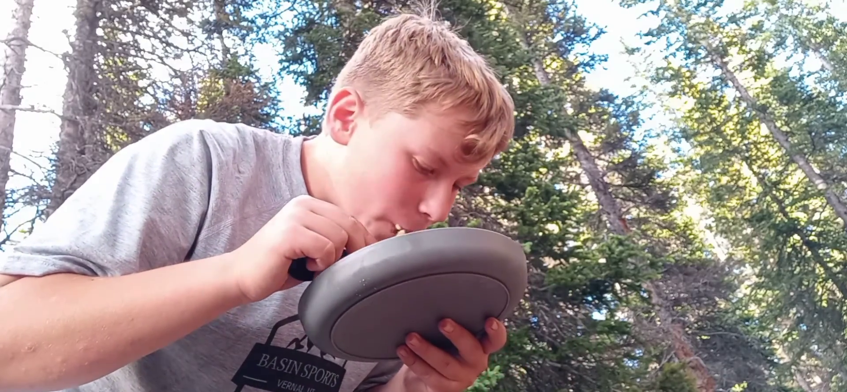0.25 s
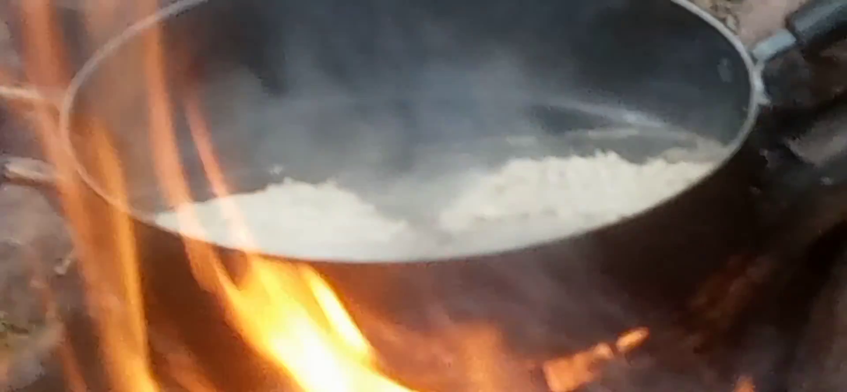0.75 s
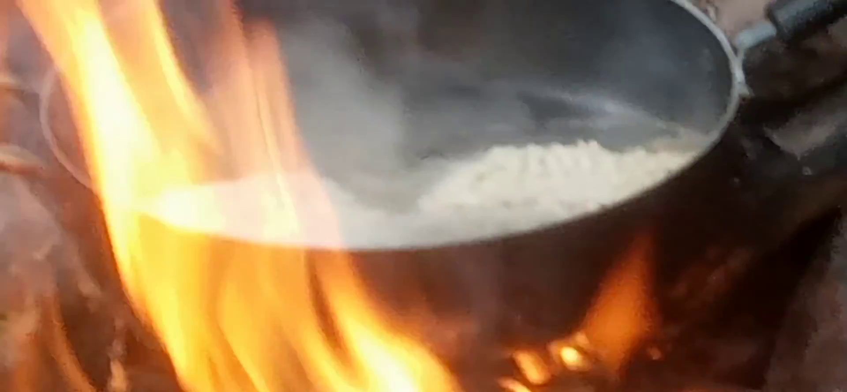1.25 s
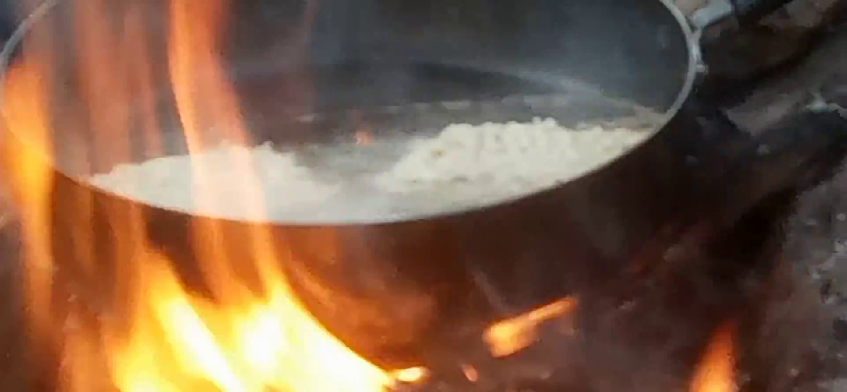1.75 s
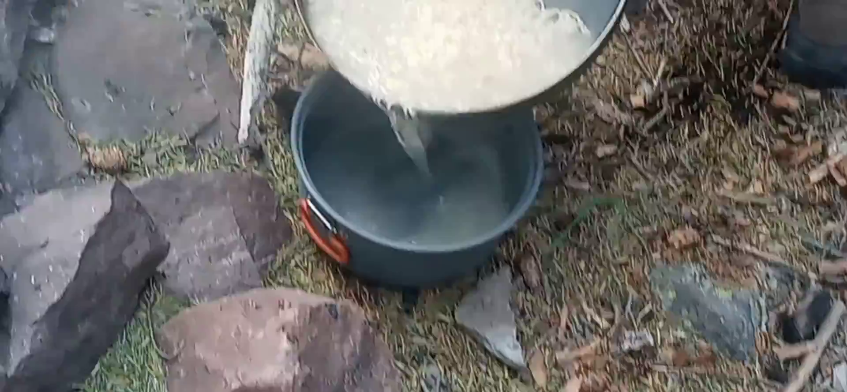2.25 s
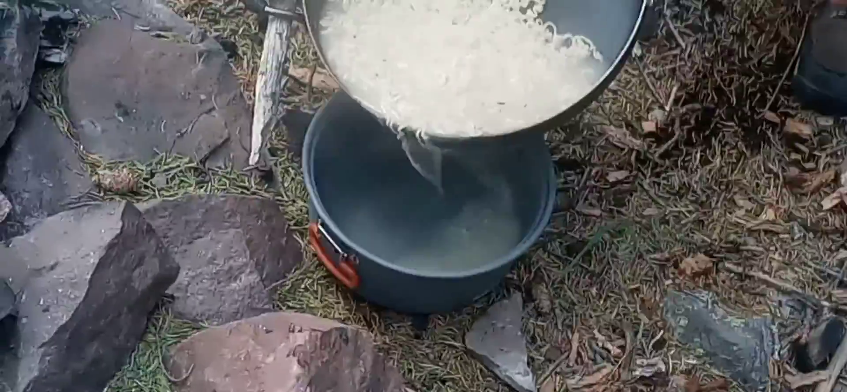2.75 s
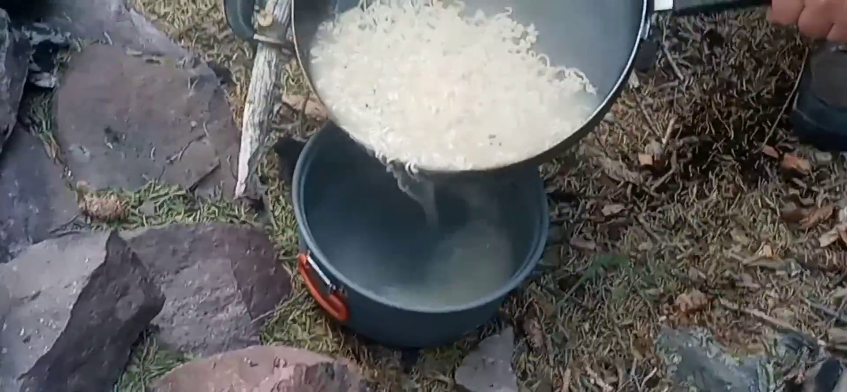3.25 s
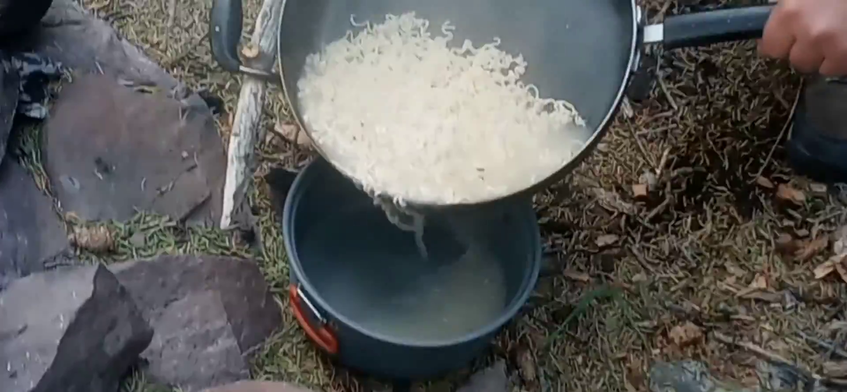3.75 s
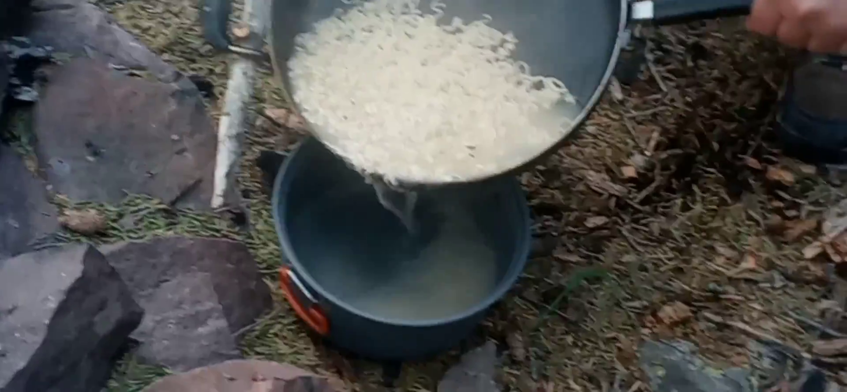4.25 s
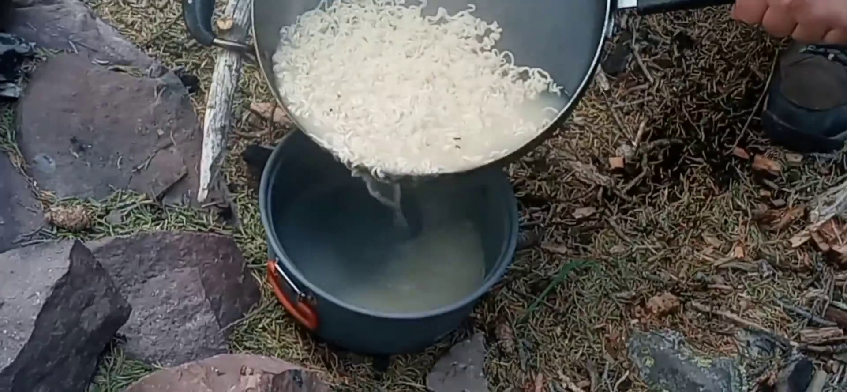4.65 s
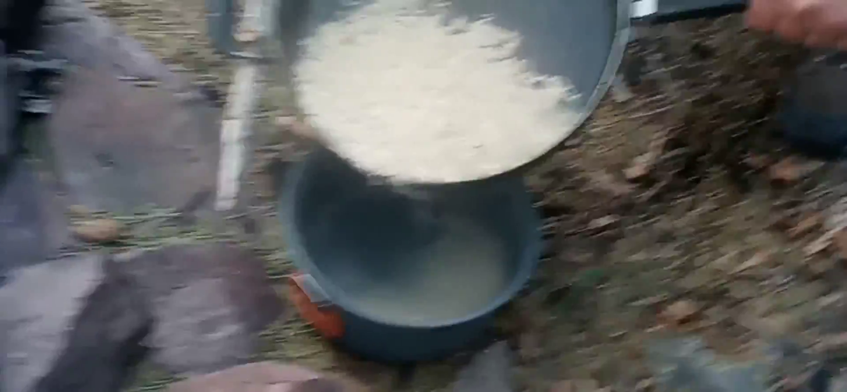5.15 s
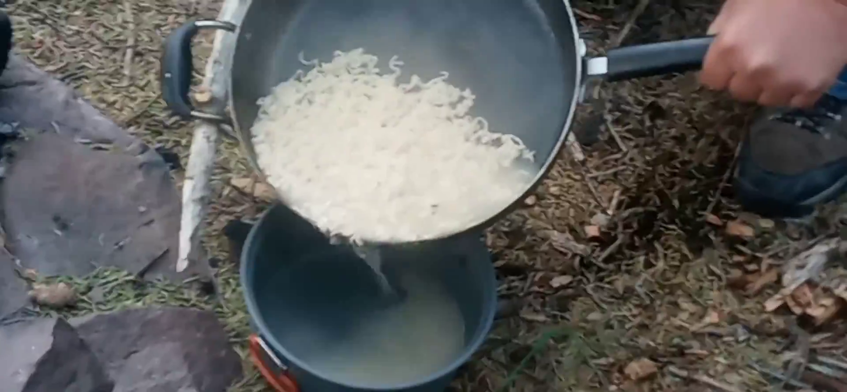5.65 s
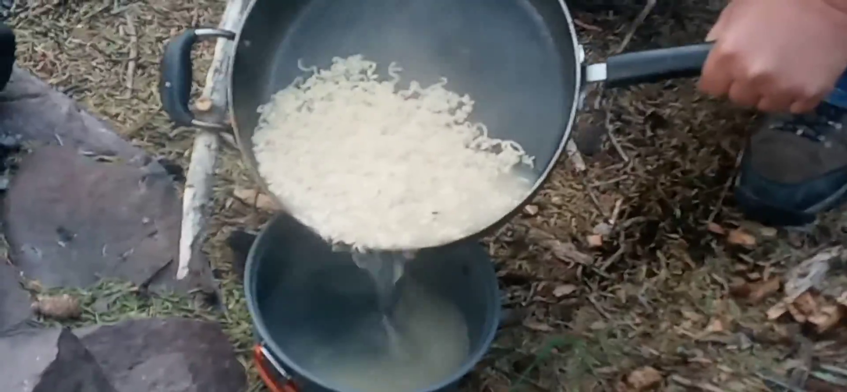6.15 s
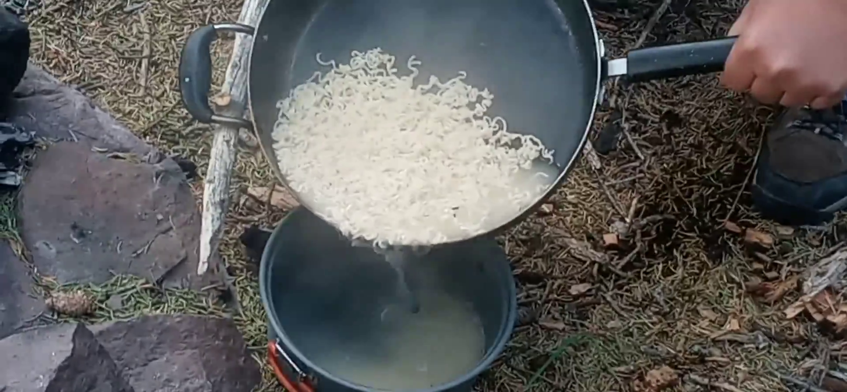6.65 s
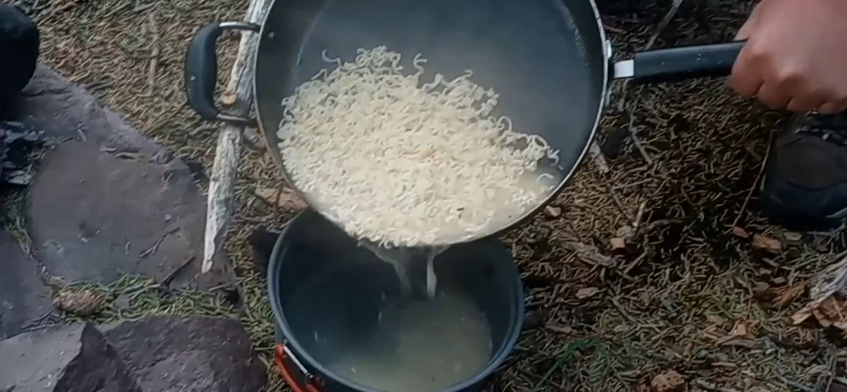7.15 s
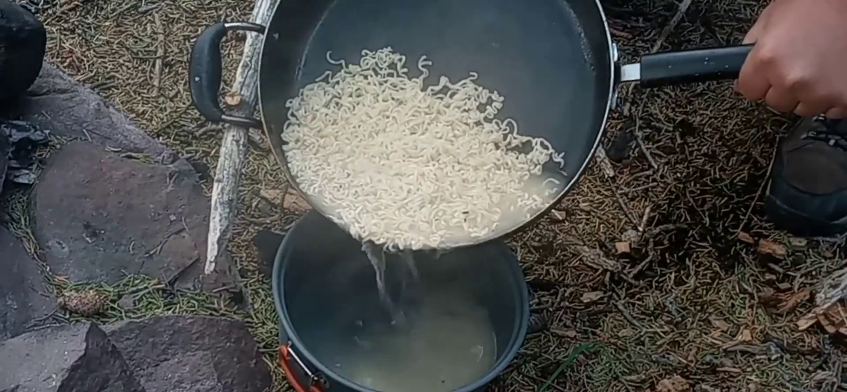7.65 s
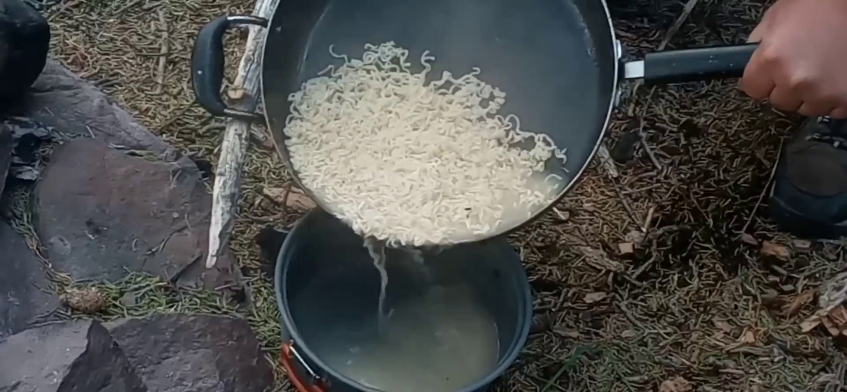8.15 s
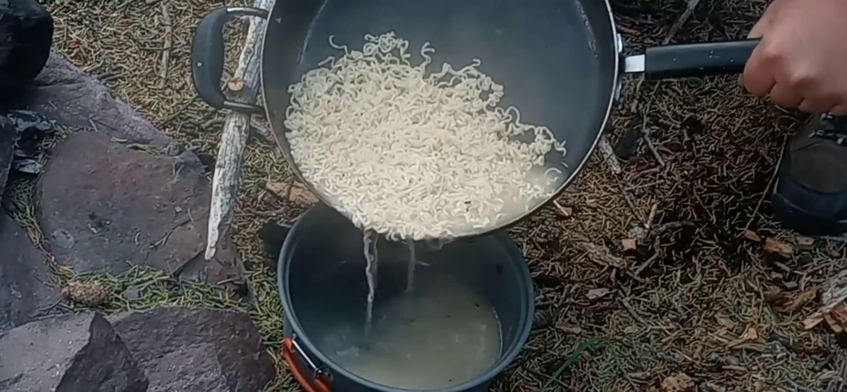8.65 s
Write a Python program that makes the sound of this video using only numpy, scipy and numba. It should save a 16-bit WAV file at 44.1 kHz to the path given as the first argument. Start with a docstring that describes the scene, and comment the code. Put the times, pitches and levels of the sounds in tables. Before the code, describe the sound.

From 0 to 0.4 seconds, soft open forest air with very faint, light taps like a fork in a bowl and a small low wood thump near 0.24. A hard cut at 0.43 brings a close wood fire: dense dry snaps and crackles over thin bright sizzling, faint breathy steam whistles, stronger cracks near 1.0, 1.5 and 2.2, and small gas hisses. At 2.3 it cuts to broth draining into a metal pot. Light at first, the stream grows from about 3, spattering brightly and drumming on metal, its ringing notes sinking as the pot fills. It surges and falters, with a clear plink near 5.35. After 6 the metal ring gives way to hollow bubbling; the stream thins into irregular plinks and sharp drips. Stray fire pops occur near 5.1 and 6.0, with the loudest crack at 6.56. Low breeze flutters until the abrupt end near 8.95.

```python
"""First comes still forest air with light taps like a fork in a bowl, then noodles sizzling over a wood fire,
then broth drained into a metal pot: three moments at a camp, cut together. Filtered impulses and bubble tones make
the stream; resonances ring the pot, whose wall notes sink as it fills, and the stream thins into drips. Shaped noise
bursts make the wood pop and vent gas, narrow noise its faint whistles, coloured noise the air, breeze and flames."""
import sys
import numpy as np
from scipy import signal
from scipy.fft import rfft, irfft
from scipy.io import wavfile
from scipy.ndimage import uniform_filter1d
from numba import njit

SR = 44100
rng = np.random.default_rng(int(sys.argv[2]) if len(sys.argv) > 2 else 0)


def to_wav(s):
    """Save 16-bit WAV."""
    ch = np.atleast_2d(s).T  # columns
    pcm = np.round(np.clip(ch, -1, 1) * 32767)  # PCM
    wavfile.write(sys.argv[1], SR, pcm.astype(np.int16))


N = 392490
TIME = np.arange(N) / SR  # s

# The three moments: start/s, end/s, fade-in/s
FOREST_SHOT = (0, .421, .002)
FIRE_SHOT = (.43, 2.281, .004)
POUR_SHOT = (2.34, 8.95, .09)

# Steady part of the stream, before gushes and lulls: t/s, spatter level/dB, pot ring level/dB
FLOW = [(2.4, -70.5, -75.5), (2.63, -71, -72.5), (2.98, -65.5, -67), (3.15, -56.5, -68), (3.34, -60.5, -64),
        (3.72, -59.5, -66), (4.21, -57.5, -59.5), (4.61, -58.5, -62), (5.08, -53, -59.5),
        (5.22, -56.5, -56.5), (5.6, -61.5, -60), (5.98, -59, -71.5), (6.11, -62, -69.5),
        (6.69, -57.5, -71.5), (7.2, -58.5, -70), (7.52, -55, -74.5), (7.85, -55, -72.5), (8.9, -63, -72)]
# Gushes of broth breaking through the noodles: centre t/s, spatter change/dB (up is positive), half length/s
GUSHES = [(2.48, 4.5, 0.22), (3.28, 3.5, 0.067), (3.48, 2, 0.077), (3.99, 5, 0.026), (4.33, 2.5, 0.036),
          (4.72, 0, 0.055), (5.35, 0, 0.024), (5.595, 2, 0.031), (5.9, 3, 0.29), (6.37, 8, 0.034),
          (6.85, 4.5, 0.02), (7.24, 1.5, 0.064), (7.44, 2.5, 0.066), (7.63, 4, 0.0095), (7.97, -2, 0.021),
          (8.06, 5, 0.013), (8.18, 4, 0.07), (8.34, 5.5, 0.039), (8.73, 3.5, 0.021)]
# Noodles damming the stream: centre t/s, spatter change/dB (down is positive), half length/s
LULLS = [(2.89, 0, 0.051), (3.16, 2.5, 0.053), (4.095, 0.5, 0.019), (4.54, 7, 0.045), (5.75, 1.5, 0.12),
         (6.23, 0.5, .08), (7.1, 6, 0.12), (7.54, 1, 0.023), (7.8, 1.5, 0.024), (7.9, -1.5, 0.022),
         (8.11, 6, 0.021), (8.45, 1, 0.028), (8.61, 15, 0.014), (8.83, 7, 0.018)]
GUSH_RING = 1.97  # dB of pot ring for each dB of spatter change: a gush plunges deep
# Spectrum of the spatter: f/Hz, level/dB
SPATTER = [(500, -20.5), (2000, -13.5), (3000, -16.5), (3700, -18), (4050, 1.5), (4330, 5.5), (4700, -7.5),
           (5100, -2), (5800, -3.5), (7000, 2), (8500, 3.5), (10500, -6.5), (14000, -4), (16000, -16.5)]
# Bright overtones of the pot: f/Hz, width/Hz, level/dB
OVERTONES = [(4010, 21.3, -9.5), (4080, 22, 1), (4290, 16, 2.5), (4430, 18, -7), (4500, 21, -6.5),
             (4850, 34, -7), (5120, 49, -8), (7030, 130, -1), (7940, 110, -2), (9180, 120, -10)]
# Notes of the pot wall: f/Hz when nearly empty, width/Hz, power of the pitch ratio it follows,
# level/dB when nearly empty, level/dB when deep in broth
WALL = [(413.3, 11.2, 0.76, 6, -33.5), (1007.8, 9.8, 1, 6.5, 4), (1380, 15.5, 0.73, 5.5, -6),
        (1822, 59, .8, -5.5, -7.5)]
# Broth loading the wall: t/s, pitch ratio
FILL = [(2.4, 1), (3.0, .978), (3.6, .947), (4.35, .908), (5.6, .862), (6.4, .828), (8.9, .77)]
# Notes of the air in the pot: f/Hz, width/Hz, level/dB
CAVITY = [(589, 100, -14), (816, 23, -5), (933, 26, -1.5), (1256, 13.3, 10), (1359, 29, 2.5),
          (1667, 24, -4), (1857, 50, 6), (2498, 24, 8), (3284, 60, 2), (3785, 61, 16), (4790, 40, 9.5)]
# The brightest wall note sinks only a little: CHIME_SINK is its power of the pitch ratio
CHIME_HZ, CHIME_WIDTH_HZ, CHIME_SINK, CHIME_DB = 4447, 45, 0.092, -13.5
WANDER_DB, WANDER_PER_S = 3.5, 12  # the stream wanders over the pot: rms drift, new values per second
SLOSH, SLOSH_PER_S = .007, 12  # sloshing bends the wall notes: rms share of pitch, new values per second

# Drops slapping the broth, before the air rings: t/s, peak level/dB, f/Hz of the centre
DROPS = [(2.6734, -38.5, 4050), (2.75, -41, 8600), (2.8252, -37, 3830), (2.981, -41.5, 4630),
         (3.0746, -31.5, 7100), (3.1244, -37, 12700), (3.174, -34.5, 6500), (3.2017, -44, 4470),
         (3.315, -43, 4220), (3.3338, -29.5, 9400), (3.466, -39.5, 9300), (3.5639, -35.5, 6900),
         (3.6838, -39, 10290), (3.9427, -31, 10800), (3.9726, -30, 9090), (4.0021, -35.5, 4360),
         (4.2152, -31.5, 9500), (4.309, -33.5, 7100), (4.36, -36.5, 8200), (4.4062, -40, 4330),
         (4.581, -35.5, 4180), (4.6165, -34.5, 13300), (4.728, -37, 14700), (4.7418, -43, 4380),
         (4.8028, -37.5, 13000), (4.943, -34.5, 7930), (5.0884, -40, 7240), (5.324, -33.5, 4160),
         (5.421, -38.5, 4040), (5.445, -33.5, 12300), (5.5186, -42, 4310), (5.5688, -35, 4170),
         (5.628, -40, 7100), (5.669, -32.5, 5400), (5.8036, -42, 4180), (5.836, -40, 4310),
         (5.896, -37, 4340), (6.351, -38, 4220), (6.3716, -33.5, 4180), (6.6368, -38, 8050),
         (6.7729, -41, 8050), (6.8342, -23, 11900), (6.969, -37, 8160), (6.989, -34, 7340),
         (7.2826, -34.5, 8200), (7.3442, -40.5, 4260), (7.3988, -32.5, 3940), (7.4153, -30, 12100),
         (7.4336, -42.5, 4220), (7.4675, -32, 6600), (7.5982, -39, 4200), (7.6349, -35, 4200),
         (7.6812, -34.5, 8830), (7.7048, -40, 8830), (7.7387, -41, 7840), (7.7724, -39, 4260),
         (7.832, -41.5, 4150), (7.9464, -25, 3540), (7.9697, -38, 4220), (7.9878, -37.5, 4310),
         (8.0298, -40, 8600), (8.1716, -35, 4260), (8.2745, -33.5, 4330), (8.305, -30.5, 8000),
         (8.3795, -36.5, 8000), (8.49, -41, 4330), (8.5581, -39.5, 4330), (8.641, -32.5, 8500),
         (8.7131, -33, 7000), (8.733, -36, 4150), (8.8646, -22.5, 6600)]
# Large bubbles, before their shared 2 dB lift: t/s, tone level/dB, f/Hz
PLINKS = [(2.728, -41, 2564), (3.308, -44, 1470), (2.975, -57.5, 1340), (3.76, -48, 1413),
          (3.868, -55, 934), (3.873, -52, 1620), (4.06, -61, 870), (4.187, -58, 1300), (4.359, -51, 1710),
          (4.462, -53, 1700), (4.85, -54, 903), (4.889, -47, 910), (5.267, -55, 1280), (5.289, -48, 1650),
          (5.349, -31.5, 2610), (5.352, -40, 1920), (5.536, -51.5, 2540), (5.59, -49.5, 937),
          (5.594, -50, 1310), (5.908, -54, 1310), (6.068, -52, 1870), (6.085, -56, 1350),
          (6.321, -54, 2520), (6.354, -48, 1335), (6.377, -51, 1873), (6.405, -55, 1330), (6.44, -59, 1040),
          (6.844, -55, 2530), (6.703, -52.5, 2500), (6.932, -38.5, 2140), (7.118, -56.5, 950),
          (7.225, -62, 960), (7.245, -58, 1770), (7.39, -66, 1060), (7.468, -67, 745), (7.472, -51.5, 2500),
          (7.48, -60, 1580), (7.627, -44.5, 2560), (7.638, -48, 1910), (7.83, -37, 2660),
          (7.946, -41.5, 2010), (7.951, -52, 1540), (8.049, -52, 2530), (8.154, -43.5, 1282),
          (8.211, -53, 1300), (8.218, -60, 1640), (8.273, -41, 2630), (8.275, -53, 1300),
          (8.334, -54, 1300), (8.554, -56.5, 1285), (8.655, -56, 1243), (8.712, -42, 1297),
          (8.715, -41.5, 937), (8.864, -51.5, 1900)]
# Knots of churned-up bubbles: t/s, nominal level/dB before per-bubble trim and ring, f/Hz of the centre, length/s
GURGLES = [(2.461, -64, 2930, 0.11), (2.918, -66, 1980, 0.078), (3.292, -63, 1550, 0.054),
           (3.774, -62.5, 810, 0.08), (4.303, -66, 2000, 0.11), (4.574, -54.5, 2780, 0.047),
           (5.121, -59, 1920, 0.043), (5.261, -60, 1450, 0.052), (5.831, -62, 890, 0.052),
           (5.907, -54, 1800, 0.052), (6.322, -60.5, 1600, 0.12), (6.35, -70, 884, .08),
           (6.787, -65, 1210, 0.04), (6.88, -56, 2420, 0.015), (7.027, -54, 5900, 0.016),
           (7.21, -61.5, 1300, 0.042), (7.369, -62, 740, 0.037), (7.389, -56, 4100, .03),
           (7.409, -67.5, 610, .09), (7.468, -63.5, 1310, 0.046), (7.611, -55.5, 2320, 0.019),
           (7.681, -64, 1740, 0.045), (7.93, -60, 1210, 0.024), (8.044, -64, 1630, 0.034),
           (8.188, -75, 760, .05), (8.208, -63.5, 1520, 0.035), (8.318, -77, 1720, 0.054),
           (8.635, -62, 1530, 0.033), (8.71, -56, 384, 0.038), (8.715, -53, 1160, 0.012)]
GURGLE_OCTAVES, GURGLE_RING_DB = 0.408, -1  # spread of the bubble pitches; send to the air in the pot
BUBBLES_PER_S = 340  # within a knot
# Notes held while the stream settles on one spot: centre t/s, level/dB, f/Hz, half length/s
HELD_NOTES = [(3.407, -65, 404, 0.073), (4.003, -67, 393, 0.044), (5.447, -68, 927, 0.11),
              (5.553, -64.5, 2525, .06), (5.72, -70, 2520, 0.075), (5.72, -72, 1695, 0.18),
              (5.8, -72, 1350, .1), (5.892, -70, 2520, 0.065), (7.504, -67, 790, .05),
              (7.626, -68, 2550, .06)]
HELD_WIDTH_HZ = 34

# Wood pops: t/s, tearing after the break level/dB, thud level/dB, body level/dB, body centre f/Hz,
# crack level/dB, crack centre f/Hz, snap level/dB, snap tilt/dB per octave
POPS = [(0.238, 22, -17, -16.5, 1480, -20.5, 3620, -16.5, 7),
        (0.4402, 8, -56, -25, 1230, -8.5, 4210, -14, 0), (0.4664, 8, -50, -53, 1910, -21, 4450, -14, 1),
        (0.506, 8, -22, -32, 2860, -6, 3860, -8, -4), (0.573, 6, -46, -22.5, 1810, -1, 4150, -4.5, 3),
        (0.61, 3, -44, -54, 2130, -30, 3210, -17, -5), (0.623, 6, -54, -53, 2030, -21, 4510, -15, 3),
        (0.6567, 0, -26, -26, 2370, -6.5, 4050, -7, -3), (0.7393, -2, -51, -32, 2500, -17, 4570, -10.5, 3),
        (0.7561, 1, -50, -18.5, 2140, 1, 3670, -4, -4), (0.7706, -5, -41, -48, 2090, -12, 3530, -17, -9),
        (0.8068, 7, -25, -16, 2090, -1, 3930, -16, 3), (0.8319, -8, -24, -15, 1910, 2.5, 3900, 4.5, -0.5),
        (0.856, -7, -48, -22, 1640, -33, 4180, -14, -5), (0.8913, 3, -42, -25.5, 1310, -3, 3700, -2, -3),
        (0.9103, -7, -50, -48, 2240, -11, 3850, -42, -1), (0.985, 4.5, -20, 0, 3150, -3, 4300, 3, 13),
        (1.0095, -4, -51, -22, 2300, -15, 3830, -10, -1), (1.0561, 3, -49, -38, 940, -7, 4010, -7.5, 1),
        (1.063, 4, -51, -29, 2160, -7.5, 3840, -7, -1), (1.0888, 5, -20, -21, 2150, -16, 3840, -12, 4),
        (1.114, -15, -56, -58, 1980, -25, 4120, -17, 15), (1.1217, 1, -51, -29, 1920, -10, 3880, -10, 3),
        (1.151, 0, -56, -23.5, 1630, -10.5, 4860, -6, 7), (1.1594, -9, -49, -49, 2070, -37, 4200, -12, 6),
        (1.2042, 2, -24, -26, 1780, -10, 3700, -7, -4), (1.2164, -6, -24, -49, 2030, -20, 4540, -10, 8),
        (1.2311, -2, -40, -29, 1530, -5.5, 4000, -5.5, -16), (1.2556, 9, -47, -51, 2140, -19, 3120, -11, 5),
        (1.2856, -6, -23, -22, 1830, -11, 4070, -3.5, -2), (1.3717, 2, -49, -48, 1760, -14, 3930, -9, 0),
        (1.3862, 1, -29, -25, 2170, -3, 4130, -5, 4), (1.3967, -2, -37, -21, 2140, -3, 4620, -2, 1),
        (1.4136, -5, -55, -27, 1540, -4, 3770, -5, 4), (1.4194, 8, -52, -20, 2580, -6, 3730, -4.5, -1),
        (1.4551, 4, -45, -49, 2180, -13, 4710, -11, 7), (1.5053, -1.5, -35, 0, 2120, 11.5, 4200, 8.5, -11),
        (1.5575, 10, -22, -13.5, 2040, -9.5, 3310, -39, 0),
        (1.5736, -7, -50, -22, 2780, -31, 3890, -14, -10), (1.61, 0, -44, -54, 2070, -15, 3440, -18, 6),
        (1.6446, 16, -15, -2.5, 2140, 2, 3480, -1.5, 3), (1.7132, 8, -20, -51, 2100, -12.5, 4080, -4, 7),
        (1.7469, 3, -56, -26, 3200, -14, 4300, -9.5, 7), (1.8802, 10, -16, -11, 1560, -1, 4500, -2, 14),
        (1.912, 1, -50, -37, 1380, -15, 4100, -18, 1), (1.9533, 8, -49, -30, 1700, -6.5, 3900, -10, 3),
        (2.0287, 9, -42, -23, 2610, -6, 4100, -5.5, -6), (2.0675, 10, -29, -30, 2100, -13, 3840, -19, -11),
        (2.0784, -15, -25, -15, 2000, 2.5, 4200, -9, -10), (2.107, -7, -55, -56, 2130, -19, 4190, -19, 9),
        (2.1818, -7, -1.5, 0.5, 1510, 9.5, 3690, 11, 7.5),
        (2.2718, -6, -35, -34, 1670, -14.5, 4450, -10, -2),
        (3.2515, -14, -30, -10.5, 2080, -10.5, 3700, -58, -1),
        (4.6702, -5, -35, -8, 2070, -5, 3730, -16, -12),
        (4.6948, -16, -41.5, -15.5, 2590, -38, 3340, -51, -1),
        (4.928, 5, -14, -11.5, 2230, -23, 4030, -16, 5),
        (5.0604, -8.5, -33, 2.5, 1540, 6.5, 3580, -14, -10),
        (5.2128, 4, -39, -13, 1820, -9.5, 3880, -33, -13), (5.9396, 15, -19, -13, 2570, -6, 3990, -21, 6),
        (6.0068, 2.5, -11, 3.5, 2890, 6, 3950, 4.5, 0), (6.5627, -4.5, 9.5, 13, 1700, 15.5, 3900, 0.5, -7)]
# Spectrum of the thud of a pop: f/Hz, level/dB
THUD = [(40, -13.5), (130, 0), (350, 1), (600, -4), (1200, -13), (2500, -57.5)]
# Spectra of the body and the crack of a pop: multiple of the centre frequency, level/dB
BODY = [(.25, -42), (.4, -9.5), (.55, -6), (1, -1), (1.5, -2), (3, -34)]
CRACK = [(.55, -32), (.82, -7.5), (1, 0.5), (1.15, -4.5), (1.5, -19), (3, -38.5)]
# Spectra of the snap and of the tearing wood: f/Hz, level/dB
SNAP = [(3500, -43.5), (5500, -12.5), (7000, -8.5), (8500, 1), (10500, -5.5), (12500, -4), (16000, -12.5),
        (22000, -23)]
TEARING = [(250, -9), (1000, 1.5)]
SNAP_PIVOT_HZ = 9000  # each snap tilts about this frequency
# Gas escaping after a pop: t/s, body level/dB, f/Hz of the body, hiss level/dB, length/s
JETS = [(0.997, -64, 1700, -62, .035), (1.526, -60, 1980, -51.5, 0.094), (1.652, -61, 1600, -66, .025),
        (5.072, -58, 770, -77, 0.085), (5.087, -61.5, 280, -62, 0.24), (5.125, -58.5, 1910, -67, .2),
        (6.025, -51, 3350, -45.5, 0.048), (6.579, -44, 3100, -53, 0.057)]

# Pan and embers, before FRYING_DB: t/s, level/dB
SIZZLE = [(0.56, -55), (0.626, -55), (1.214, -51.5), (1.566, -52.5), (1.736, -57), (2.1, -52.5),
          (2.2, -55.5)]
FRYING_DB = 3
# Spectrum of the sizzle, also the hiss of the gas: f/Hz, level/dB
SIZZLE_COLOUR = [(400, -42), (1100, -21.5), (2000, -15), (2900, -16), (3500, 3), (4200, 2), (5300, -9),
                 (6800, -4.5), (8500, 4), (10500, -1.5), (16000, -8.5)]
# Steam whistling out of the wood: centre t/s, level/dB, f/Hz, half length/s
WHISTLES = [(0.475, -70.5, 1063, 0.06), (0.722, -78, 1200, .06), (0.782, -66, 1080, 0.065),
            (0.848, -72, 356, 0.17), (1.152, -72.5, 1094, .07), (1.951, -73.5, 1064, 0.056)]
WHISTLE_SAG_PER_S, WHISTLE_WIDTH_HZ = 0.29, 21  # share of the pitch lost each second as pressure drops
# Light taps, like a fork in a bowl: t/s, peak level/dB, f/Hz
TAPS = [(0.019, -55, 746), (0.024, -64, 1260), (.045, -64, 670), (0.085, -61, 795), (.088, -69, 1370),
        (0.134, -67, 1370), (0.146, -62, 935), (.168, -72, 1110), (0.225, -62, 4130), (0.266, -57.5, 905),
        (0.331, -64, 1070), (.36, -75, 1260)]

# Spectrum of the forest air: f/Hz, level/dB
AIR_COLOUR = [(100, 1.5), (400, 1), (850, -5.5), (1500, -2.5), (2500, -4), (3800, -4), (5500, -17),
              (8500, 2.5), (12000, -13), (16000, -12.5)]
AIR_DB = -69
# Spectrum of breeze and flames: f/Hz, level/dB
RUMBLE_COLOUR = [(20, -50), (45, -8.5), (80, 5.5), (160, 4), (280, -7.5), (500, -25.5), (1200, -23),
                 (4000, -75.5)]
# Breeze and flames, before puffs and flutter: t/s, rumble level/dB
BREEZE = [(0, -68), (2.2, -68), (2.4, -74), (3.1, -63.5), (5.4, -65.5), (6.3, -72.5), (7.8, -74.5),
          (8.9, -71.5)]
# Puffs of wind on the microphone: centre t/s, rise/dB, half length/s
PUFFS = [(.045, 13, 0.03), (.35, 13.5, 0.064), (1.29, 9.5, 0.039), (5.11, 7, 0.14), (5.34, 9, 0.17),
         (5.73, 6, 0.036), (6.01, 9, 0.25), (6.45, 14.5, 0.028), (6.84, 17.5, 0.018), (6.98, 13, 0.063),
         (7.43, 15.5, 0.061), (8.1, 10.5, 0.038), (8.66, 10.5, 0.051)]
TOP_HZ = 16200  # edge of the final low-pass


def stream():
    """Broth lands in clumps: it spatters and drums on the pot, less on the metal as the pool deepens."""
    surge_db = swells(GUSHES) - swells(LULLS)
    fill = curve(FILL)
    depth = (1 - fill) / (1 - fill.min())
    # the smooth stream breaks up into strings of drops as the pan empties
    clumps = undb((1.8 + 1.5 * depth) * walk(50) + 1.2 * walk(16))
    impacts = ticks(rate=620, spread_db=4.4, top_db=19) * clumps
    spray = smear(impacts, tail_db=2, t60=0.02)
    spatter_gain = undb(curve(FLOW) + surge_db)
    ring_gain = undb(curve(FLOW, axis=2) + GUSH_RING * surge_db)
    return (spatter_gain * spatter(spray, clumps, fill, depth)
            + ring_gain * pot_ring(spray, clumps, fill, depth))


def spatter(spray, clumps, fill, depth):
    """Droplets and fizzing bubbles of many sizes, brightened by the pot's overtones and one chiming wall note."""
    fine = fizz(count=4500, low_hz=2600, high_hz=14000, cycles=40, spread_db=17)
    droplets = unit(glint(spray, depth_db=4.5, rate=70) + undb(-5) * fine * clumps)
    splashes = unit(colour(droplets, SPATTER))
    overtones = unit(ring(spray, OVERTONES))
    chime = unit(band(spray, CHIME_HZ * fill ** CHIME_SINK, CHIME_WIDTH_HZ))
    overtone_gain = undb(-5) * (0.69 + 0.49 * depth)
    return unit(splashes + overtone_gain * overtones + undb(CHIME_DB) * chime)


def pot_ring(spray, clumps, fill, depth):
    """The stream drums on the broth-loaded wall; later, trapped bubbles sound the air above the pool."""
    drumming = spray + clumps * rng.standard_normal(N)
    wall = np.zeros(N)
    for hz, width, sink, empty_db, deep_db in WALL:
        # the wandering stream favours now one note, now another
        drive = drumming * undb(WANDER_DB * walk(WANDER_PER_S))
        pitch = hz * fill ** sink * (1 + SLOSH * walk(SLOSH_PER_S))
        wall += undb(empty_db + (deep_db - empty_db) * depth) * band(drive, pitch, width)
    gurgle = clumps * fizz(count=2400, low_hz=550, high_hz=3000, cycles=20, spread_db=15)
    air = unit(ring(gurgle + undb(-1.5) * spray, CAVITY))
    # equal-power crossfade from the wall to the air
    wall_share = np.interp(TIME, [4.5, 5.6, 6.2], [.85, .5, .1])
    return np.sqrt(wall_share) * unit(wall) + np.sqrt(1 - wall_share) * air


def drips():
    """Single drops slap the pool; large bubbles plink and set the air in the pot ringing."""
    slaps, plinks = np.zeros(N), np.zeros(N)
    for s, db, hz in DROPS:
        rebounds = np.repeat(undb(5 * rng.standard_normal(32)), 128)  # thrown-up droplets fall back unevenly
        impact = burst(t60=0.0035) + undb(-9.5) * burst(t60=0.052) * rebounds
        splash = colour(impact, SPATTER)
        slap = band(splash, hz, hz / 12) + undb(-13.0) * splash + undb(-11) * ring(splash, OVERTONES)
        add(slaps, s, undb(db) * slap / np.abs(slap).max())
    for s, db, hz in PLINKS:
        trapping_splash = band(burst(t60=0.08), hz, hz / 2)
        add(plinks, s, undb(db + 18.5) * trapping_splash)
        add(plinks, s + 0.00093, undb(db) * bubble(hz, cycles=49.6, glide=0.0089))
    return slaps + undb(2.0) * plinks + undb(1.0) * ring(plinks + slaps, CAVITY)


def gurgles():
    """Each knot is a quick run of bubbles of neighbouring sizes, coloured by the air in the pot."""
    out = np.zeros(N)
    for s, db, hz, length in GURGLES:
        count = int(length * BUBBLES_PER_S) + 1
        chances = rng.uniform(-0.92, 1, (512, 3))[:count]
        for k, (when, size, strength) in enumerate(chances):
            pitch = hz * 2 ** (np.sqrt(3) * GURGLE_OCTAVES * size)
            blip = bubble(pitch, cycles=26, glide=0.08)
            share = np.sqrt(SR / BUBBLES_PER_S) / np.linalg.norm(blip)  # same energy for every size
            gain = undb(db + 3.8 * strength - 7)
            add(out, s + (k + when) / BUBBLES_PER_S, gain * share * blip)
    return out + undb(GURGLE_RING_DB) * ring(out, CAVITY)


def held_notes():
    """Fine drops keep one resonance of the pot ringing, unevenly."""
    drive = ticks(rate=500, spread_db=3, top_db=12) * undb(4.5 * walk(30))
    out = np.zeros(N)
    for s, db, hz, length in HELD_NOTES:
        note = unit(band(drive, hz, HELD_WIDTH_HZ))
        out += undb(db) * note * swells([(s, 1, length)])  # here the swell is a plain gain
    return out


def sizzle():
    """Tiny bursts in the hot pan and the embers: sharp, separate crackles over a thin hiss."""
    bursts = ticks(rate=420 * undb(3 * walk(25)), spread_db=4.2, top_db=19)
    crackle = smear(bursts, tail_db=-1, t60=0.007)
    hiss = rng.standard_normal(N) * undb(2.3 * walk(30.9))
    mix = glint(crackle, depth_db=3.5, rate=100) + undb(-5) * hiss
    frying = unit(colour(mix, SIZZLE_COLOUR))
    return undb(curve(SIZZLE) + FRYING_DB) * frying


def pops():
    """Pockets of steam burst in the wood: a break and its tearing, shaped by a thud, body, crack and snap."""
    out, hz = np.zeros(N), np.geomspace(20, SR / 2, 160)
    for s, tear_db, thud_db, body_db, body_hz, crack_db, crack_hz, snap_db, tilt_db in POPS:
        # one clean break, then the wood tears and the stones scatter it
        tear = burst(t60=.01) + undb(-8) * burst(t60=.022)
        scatter = undb(-27) * burst(t60=.06)
        rupture = colour(undb(tear_db) * tear + scatter, TEARING)
        rupture[0] += 1
        thud = thud_db + hump(hz, THUD)
        body = body_db + hump(hz / body_hz, BODY)
        crack = crack_db + hump(hz / crack_hz, CRACK)
        snap = snap_db + hump(hz, SNAP) + tilt_db * np.log2(hz / SNAP_PIVOT_HZ)
        power = sum(undb(db) ** 2 for db in (thud, body, crack, snap))
        spectrum = np.column_stack([hz, 10 * np.log10(power + 1e-7)])
        add(out, s, colour(rupture / np.linalg.norm(rupture), spectrum))
    return out


def jets():
    """Gas vents from the wood: a dying noise split into a broad resonant body and a hiss."""
    out = np.zeros(N)
    for s, body_db, centre_hz, hiss_db, length in JETS:
        gas = burst(t60=4 * length, size=32768)
        body = band(band(gas, centre_hz, centre_hz), centre_hz, 2 * centre_hz)
        hiss = colour(gas, SIZZLE_COLOUR)
        for db, part in ((body_db, body), (hiss_db, hiss)):
            add(out, s, undb(db) * part / np.std(part[:int(length * SR)]))
    return out


def whistles():
    """Steam makes brief breathy tones, narrow bands of noise that sag as the steam runs out."""
    out = np.zeros(N)
    for s, db, hz, length in WHISTLES:
        age = np.arange(-2 * length, 2 * length, 1 / SR)
        pitch = hz * (1 - WHISTLE_SAG_PER_S * age)
        tone = band(rng.standard_normal(len(age)), pitch, WHISTLE_WIDTH_HZ)
        add(out, s - 2 * length, undb(db) * unit(tone) * np.exp(-(age / length) ** 2))
    return out


def taps():
    """Soft taps from the person eating: short noise bursts, each ringing one narrow resonance."""
    out = np.zeros(N)
    for s, db, hz in TAPS:
        tap = band(burst(t60=0.011), hz, 43)
        add(out, s, undb(db) * tap / np.abs(tap).max())
    return out


def outdoors():
    """Soft forest air and the uneven low flutter of breeze and flames, both coloured noise."""
    sway_db, flutter_db = .9 * walk(6), 2.2 * walk(20)
    air = unit(colour(rng.standard_normal(N), AIR_COLOUR))
    rumble = unit(colour(rng.standard_normal(N), RUMBLE_COLOUR))
    rumble_db = curve(BREEZE) + swells(PUFFS) + flutter_db
    return air * undb(AIR_DB + sway_db) + rumble * undb(rumble_db)


def bubble(hz, cycles, glide):
    """A trapped bubble rings for some cycles, rising in pitch as it nears the surface."""
    age = np.linspace(0, 1, int(cycles / hz * SR) + 2)
    tone = np.sin(2 * np.pi * cycles * age * (1 + glide * age / 2))
    return tone * undb(-60 * age) * (1 - np.exp(-age * cycles))


def fizz(count, low_hz, high_hz, cycles, spread_db):
    """A swarm of bubbles of random time, size and strength; rms 1."""
    out = np.zeros(N)
    for when, size, strength in rng.random((count, 3)):
        hz = low_hz * (high_hz / low_hz) ** size
        add(out, when * N / SR, undb(spread_db * strength ** 2) * bubble(hz, cycles, glide=0.038))
    return unit(out)


def ticks(rate, spread_db, top_db):
    """Random impulses at a mean rate per second, many small and a few large."""
    sizes = undb(np.minimum(spread_db * rng.exponential(size=N), top_db))
    return (rng.random(N) < rate / SR) * sizes * rng.choice([-1, 1], N)


def burst(t60, size=4096):
    """Noise of energy 1 that dies by 60 dB in t60 seconds."""
    x = rng.standard_normal(size) * undb(-60 * np.arange(size) / SR / t60)
    return x / np.linalg.norm(x)


def smear(x, tail_db, t60):
    """Give every impulse its own short tail of noise; rms 1."""
    keep = undb(-120 / SR / t60)  # this decays energy, so 120 here is a 60 dB fall
    energy = signal.lfilter([1 - keep], [1, -keep], x ** 2)
    return unit(x + undb(tail_db) * np.sqrt(energy) * rng.standard_normal(N))


def glint(x, depth_db, rate, count=14):
    """Droplets differ in size and light up different parts of the spectrum: bands of wandering level."""
    centres = np.geomspace(1500, 15000, count)
    return unit(sum(band(x, hz, hz / 6) * undb(depth_db * walk(rate)) for hz in centres))


def ring(x, notes):
    """A body with the given (f/Hz, width/Hz, level/dB) resonances."""
    return sum(undb(db) * band(x, hz, width) for hz, width, db in notes)


def band(x, hz, width):
    """One resonance, fixed or moving."""
    return resonate(x, hz * np.ones(len(x)), float(width))


@njit
def resonate(x, hz, width):
    """State-variable band-pass whose centre may move every sample."""
    y, band_state, low_state = np.empty(len(x)), 0., 0.
    for i in range(len(x)):
        g = np.tan(np.pi * min(hz[i], .45 * SR) / SR)
        k = width / hz[i]  # damping
        v = (band_state + g * (x[i] + 1e-18 - low_state)) / (1 + g * (g + k))
        band_state = 2 * v - band_state
        low_state += 2 * g * v
        y[i] = k * v
    return y


def colour(x, points, size=4096):
    """Causal minimum-phase filter with the given (f/Hz, level/dB) spectrum."""
    hz, db = np.transpose(points)
    bins = np.maximum(np.fft.rfftfreq(size, 1 / SR), 1)
    gain = undb(np.interp(np.log(bins), np.log(hz), db))
    cepstrum = irfft(np.log(gain))
    # fold the cepstrum forward in time
    cepstrum[1:size // 2] *= 2
    cepstrum[size // 2 + 1:] = 0
    impulse = irfft(np.exp(rfft(cepstrum)))
    return signal.fftconvolve(x, impulse)[:len(x)]


def hump(at, points):
    """Read a spectrum in dB on a log axis; silent beyond its ends."""
    where, db = np.transpose(points)
    return np.interp(np.log(at), np.log(where), db, -300, -300)


def swells(rows):
    """Sum of bell-shaped swells from (centre t/s, height, half length/s) rows."""
    return sum(height * np.exp(-((TIME - s) / length) ** 2) for s, height, length in rows)


def walk(rate):
    """Slow random drift of rms about 1, with rate new values per second."""
    k = int(SR / rate)
    steps = np.repeat(rng.standard_normal(N // k + 1), k)
    return unit(uniform_filter1d(steps, k)[:N])


def curve(rows, axis=1):
    """One column of a table, joined by straight lines in time."""
    rows = np.array(rows)
    return np.interp(TIME, rows[:, 0], rows[:, axis])


def undb(db):
    """Decibels to gain."""
    return 10 ** (np.asarray(db) / 20)


def unit(x):
    """Scale to rms 1."""
    return x / np.sqrt(np.mean(x ** 2))


def add(out, s, x):
    """Mix a short sound in at time s."""
    i = max(int(s * SR), 0)
    out[i:i + len(x)] += x[:max(N - i, 0)]


def shot(start, end, fade):
    """Gain that fades in at the start of one moment and cuts at its end."""
    return np.clip((TIME - start) / fade, 0, 1) * (TIME < end)


def scene():
    """The three moments in a row, with outdoor air, pops and jets running under them all."""
    forest, fire, pour = shot(*FOREST_SHOT), shot(*FIRE_SHOT), shot(*POUR_SHOT)
    pouring = pour * (stream() + drips() + gurgles() + held_notes())
    frying = fire * (sizzle() + whistles())
    eating = forest * taps()
    camp = (forest + fire + pour) * (pops() + jets() + outdoors())
    return (pouring + frying + eating + camp)[None]


def record(dry):
    """A steep elliptic low-pass cuts the top."""
    return signal.sosfilt(signal.ellip(8, .2, 70, TOP_HZ, fs=SR, output="sos"), dry)


dry = scene()
out = record(dry)
to_wav(out)
```